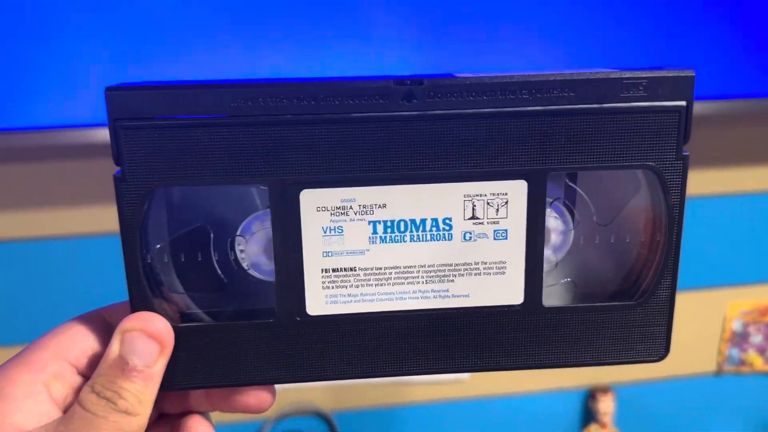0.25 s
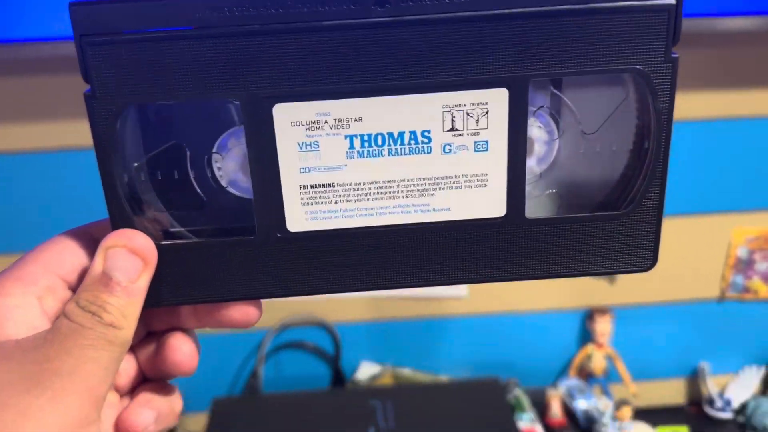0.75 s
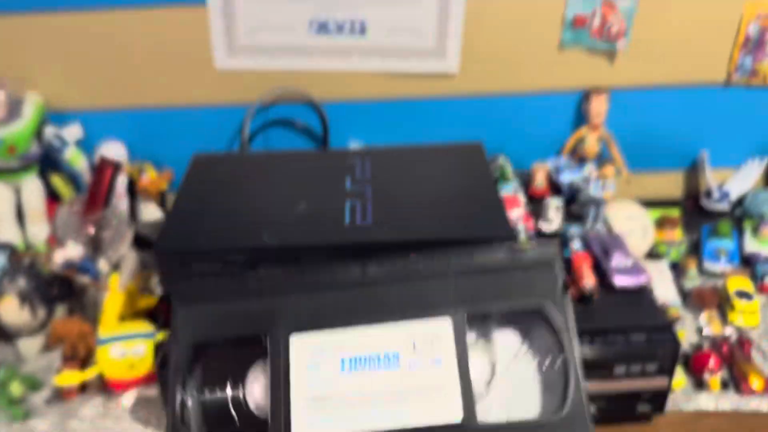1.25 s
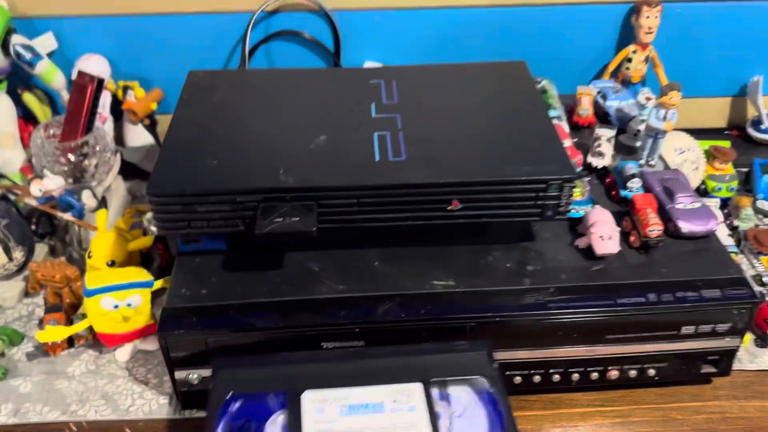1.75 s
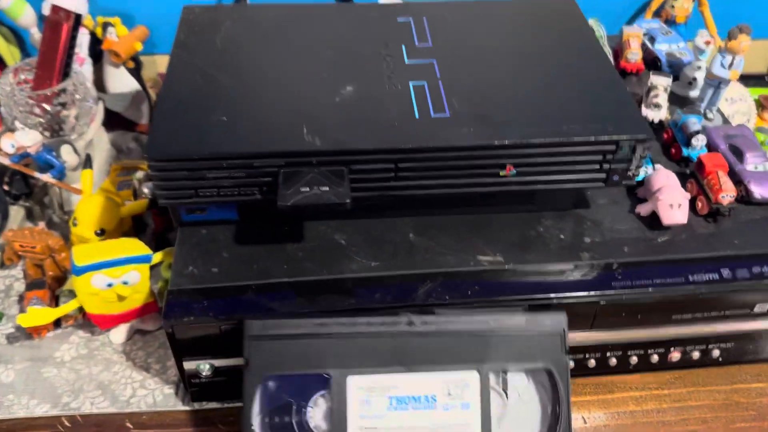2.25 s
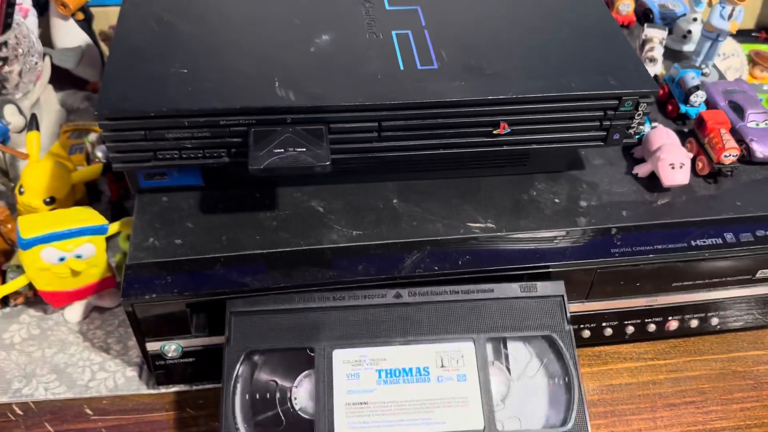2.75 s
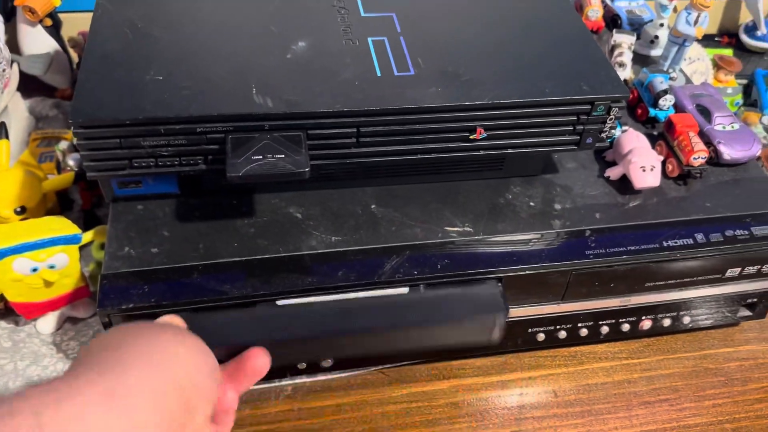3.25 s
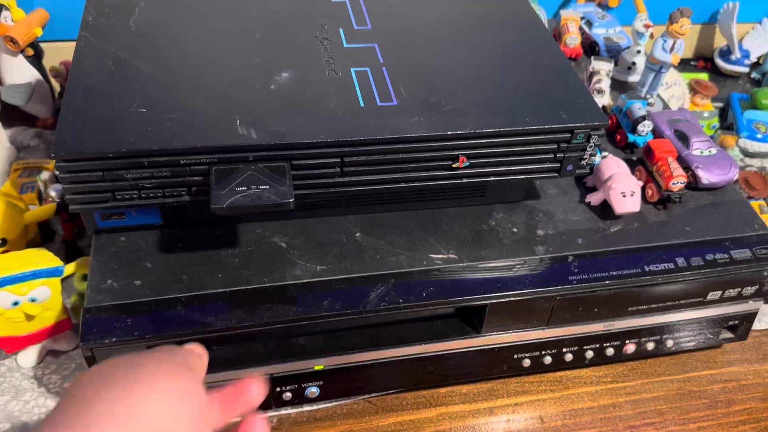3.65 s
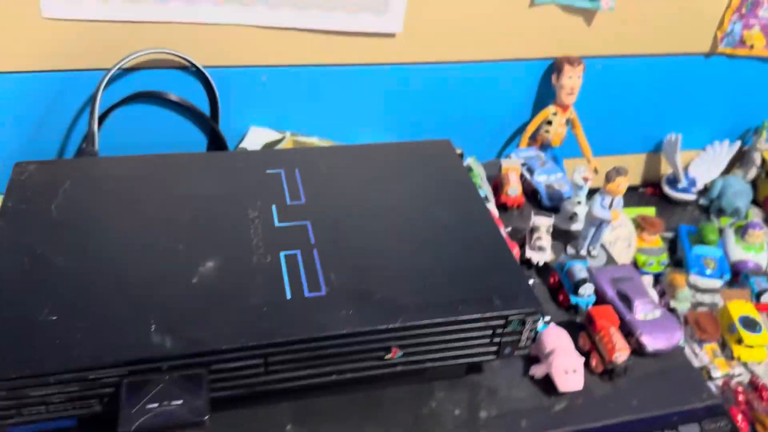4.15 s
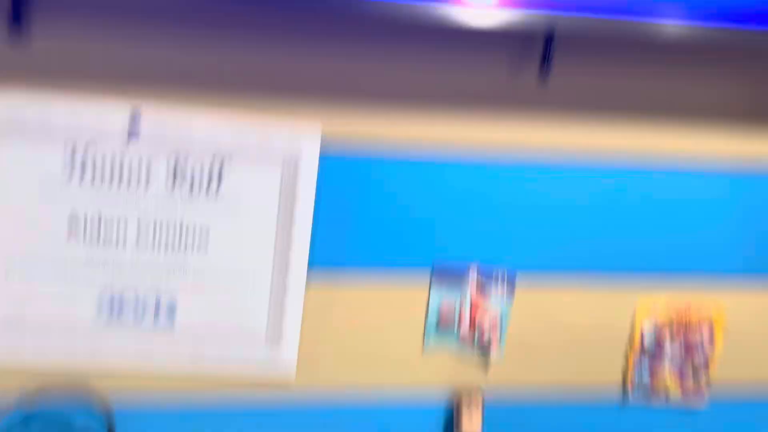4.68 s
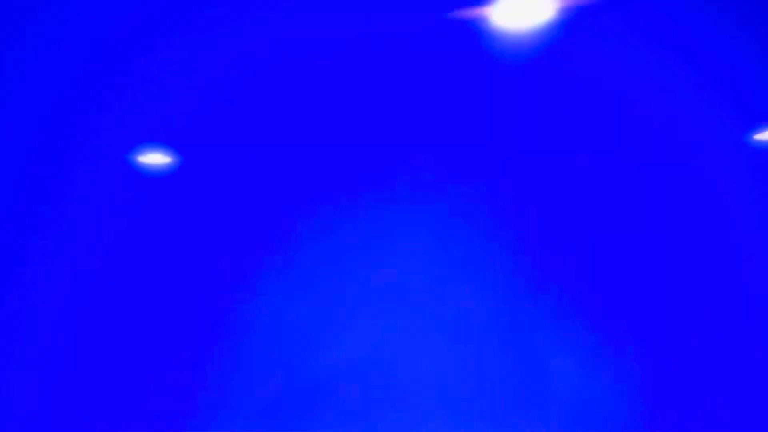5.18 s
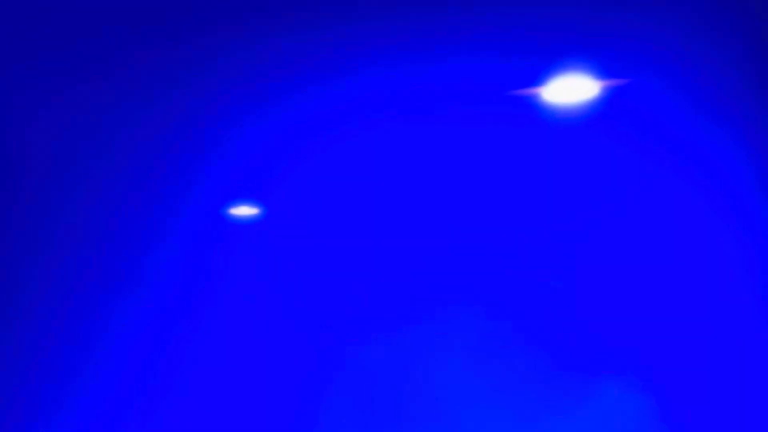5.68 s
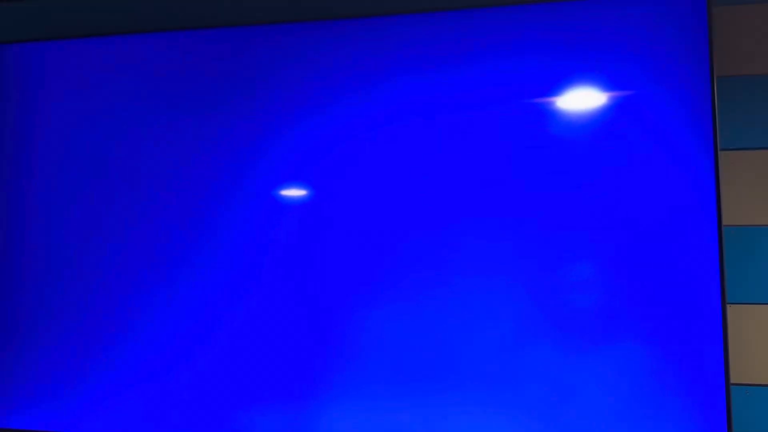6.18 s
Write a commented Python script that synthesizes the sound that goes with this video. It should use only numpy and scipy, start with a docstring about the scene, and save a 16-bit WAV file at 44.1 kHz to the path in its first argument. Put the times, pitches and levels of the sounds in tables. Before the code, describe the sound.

A plastic video cassette knocks and rattles into a player's slot, squeaks as it slides in, then duller mechanism clunks seat it in a humming room.

```python
"""A quiet room with a fan and mains hum; as the phone turns, the room's colour drifts. Near the phone a video
cassette is brought to a player: it knocks the front flap, rattles into the slot and slides in with a squeak.
Then the carriage inside seats it with a few duller clunks, and dry ticks sound close to the phone.
Blows and rubbing are noise in resonances, squeaks and flap are decaying sines, ticks are falling chirps,
and the room is shaped noise plus wavering sines."""
import sys
import numpy as np
from scipy import signal
from scipy.fft import rfft, irfft, next_fast_len
from scipy.io import wavfile
from scipy.ndimage import uniform_filter1d, map_coordinates

SR = 44100
rng = np.random.default_rng(int(sys.argv[2]) if len(sys.argv) > 2 else 0)


def bounce(signal):
    """Save signal as a 16-bit WAV file at the path given by the first command-line argument."""
    frames = np.transpose(np.atleast_2d(signal))
    limited = np.clip(frames, -1, 1)
    pcm = np.round(limited * 32767).astype(np.int16)
    wavfile.write(sys.argv[1], SR, pcm)


N = 283193
TIME = np.arange(N) / SR
SIDE = np.array([[0.5], [-0.5]])  # left, right

# Modes of the player's case. Each row: centre in Hz, width in Hz, relative level in dB.
CASE_MODES = [(135, 39, -4.5), (160, 35, 2), (195, 43, 2.5), (260, 56, 3), (357, 108, 0.5), (417, 56, 0.5)]
# Modes of the hollow cassette. Each row: centre in Hz, width in Hz, relative level in dB.
SHELL_MODES = [(563, 178, -2.5), (848, 190, -3), (955, 104, 0), (1138, 360, -6), (1297, 370, -6.5)]
# Broad top-end modes. Each row: centre in Hz, width in Hz, relative level in dB.
TOP_MODES = [(10100, 3900, 10), (14500, 3000, 7)]


def amp(db):
    """Decibels to gain."""
    return 10 ** (np.asarray(db) / 20)


def unit(x):
    """Scaled to rms 1."""
    return x / np.sqrt(np.mean(np.abs(x) ** 2) + 1e-20)


def along(points, hz):
    """(Hz, value) points interpolated on a log frequency axis."""
    f, v = np.transpose(points)
    return np.interp(np.log(hz + 1), np.log(f + 1), v)


def wobble(rate):
    """A smooth random curve, rate knots a second."""
    knots = rng.standard_normal(int(N * rate / SR) + 4)
    return map_coordinates(knots, [TIME * rate])


def filtered(x, response):
    """x through a complex response of frequency."""
    m = next_fast_len(x.shape[-1] + SR // 8)
    spectrum = rfft(x, m) * response(np.fft.rfftfreq(m, 1 / SR))
    return irfft(spectrum, m)[..., :x.shape[-1]]


def rung(x, modes):
    """x through causal resonances that keep the power of white noise."""
    def response(f):
        return unit(sum((-1) ** k * amp(db) * 1j * f * w / (c * c - f * f + 1j * f * w)
                        for k, (c, w, db) in enumerate(modes)))
    return filtered(x, response)


def favour(modes, hz, fall_db):
    """The struck spot drives the modes near one pitch hardest; others fall by fall_db per octave."""
    return [(c, w, db - fall_db * abs(np.log2(c / hz))) for c, w, db in modes]


def add(out, s, sound, pan_db, lag_s=0):
    """Places a sound at s seconds, panned, the right port lagging."""
    left, right = round(s * SR), round(s * SR) + round(lag_s * SR)
    out[0, left:][:len(sound)] += sound * amp(pan_db / 2)
    out[1, right:][:len(sound)] += sound * amp(-pan_db / 2)


def rush(spectrum, patchy_db):
    """Air noise: stereo, rms 1, with patches of random gain over time and frequency."""
    # Each row: frequency in Hz, left-right likeness from -1 to 1.
    likeness = [(60, 1), (150, 0.81), (380, 0.42), (950, -0.25), (2380, 0.086), (5980, 0.22),
                (15000, -0.56)]
    z = signal.stft(rng.standard_normal((2, N)), nperseg=512)[2]
    field = rng.standard_normal(z.shape[1:])
    field = uniform_filter1d(uniform_filter1d(field, 6, 0), 14, 1)
    pair = signal.istft(z * amp(patchy_db * unit(field)), nperseg=512)[1][:, :N]

    def response(hz):
        turn = np.arccos(np.clip(along(likeness, hz), -1, 1)) / 2
        return amp(along(spectrum, hz)) * [np.cos(turn), np.sin(turn)]

    mid, side = filtered(pair, response)
    return unit(np.array([mid + side, mid - side]))


def room_tone():
    """Rumble, fan and hiss are shaped noise that drifts as the phone turns; the hum is wavering sines."""
    # Each row: time in seconds, rumble in dB, fan in dB, hiss in dB, hum offset in dB.
    drift = [(0, -47.5, -43.5, -53, 0.7), (1.7, -46, -44, -55, -2.2), (2.8, -45, -39.5, -53, 1),
             (3.55, -43, -43, -55.5, 1.3), (5.65, -46, -45.5, -51, 1.2), (6.42, -49, -44, -52, -3.5)]
    # Noise spectra. Each row: frequency in Hz, relative density in dB.
    rumble_spectrum = [(20, -39), (30, -15.5), (48, -2), (62, -4), (80, 8.5), (100, -1.5), (125, 3),
                       (165, 0), (195, -5.5), (230, -55)]
    fan_spectrum = [(150, -40), (200, -10.5), (230, -5), (320, -3.5), (450, -8), (800, -8.5), (1200, -11.5),
                    (1700, -19), (2200, -48.5)]
    hiss_spectrum = [(820, -34), (1400, -2), (2090, -2), (2550, -3.5), (3850, -12), (6860, -13.5),
                     (9160, -23), (9950, -44), (11000, -76), (12900, -50), (14600, -41), (16500, -64)]
    # Each row: partial in Hz, rms level in dB before drift and waver, waver in knots a second.
    hum_partials = [(59.3, -47.5, 8), (119, -48.5, 6), (163, -57, 4), (226.5, -53.5, 4), (288, -57.5, 3),
                    (341, -57, 4), (454, -60.5, 3)]
    s, *levels = np.transpose(drift)
    rumble_db, fan_db, hiss_db, hum_db = (np.interp(TIME, s, db) for db in levels)
    rumble = amp(rumble_db) * rush(rumble_spectrum, patchy_db=0.1)
    fan = amp(fan_db) * rush(fan_spectrum, patchy_db=1.5)
    hiss = amp(hiss_db) * rush(hiss_spectrum, patchy_db=1.34)
    hum = np.zeros(N)
    for hz, db, rate in hum_partials:
        level = amp(db + 3 + hum_db + 2.2 * wobble(rate))  # +3 dB: rms to peak
        hum += level * np.sin(2 * np.pi * hz * TIME + 0.7 * wobble(rate))
    return rumble + fan + hiss + hum


def walls(x):
    """Echo from the walls: a noise tail in which each frequency dies at its own speed."""
    # Each row: frequency in Hz, t60 in seconds.
    decay = [(200, 0.12), (2000, 0.096), (12000, 0.014)]
    hz, t, z = signal.stft(rng.standard_normal((2, SR // 2)), SR, nperseg=256)
    tail = signal.istft(z * amp(-60 * t / along(decay, hz)[:, None]), SR, nperseg=256)[1]
    late = np.pad(x, ((0, 0), (200, 0)))  # 200 samples of delay
    left, right = signal.fftconvolve(late, tail / np.linalg.norm(tail[0]), axes=1)[:, :N]
    # the ports sit close together, so long waves reach both alike
    apart = filtered(left - right, lambda hz: 1j * hz / (600 + 1j * hz))
    return (left + right) / 2 + SIDE * apart


def ticks():
    """Each tick is a snap falling fast from 15 kHz, ending on a few cycles and a faint rustle."""
    # Each row: start in seconds, level in dB, end pitch in Hz, length in seconds,
    # rustle in dB relative to the snap, left minus right in dB.
    tick_rows = [(4.584, -50, 8600, 0.00072, -30, 3), (4.6065, -43, 3200, 0.0018, -23, 1),
                 (4.639, -40, 1800, 0.002, -13, 9), (4.6475, -31, 3100, .0016, -28, 10),
                 (4.9221, -27, 3300, .0013, -36, 1), (5.045, -42, 7100, 0.0016, -3, 10)]
    start_db = -16  # the high start is weaker than the end
    out, t = np.zeros((2, N)), np.arange(SR // 20) / SR
    for s, db, end_hz, length_s, rustle_db, pan_db in tick_rows:
        fall = np.exp(-7 * t / length_s)
        pitch_hz = end_hz + (15000 - end_hz) * fall
        tone = np.sin(2 * np.pi * (np.cumsum(pitch_hz) / SR + rng.random()))
        snap = amp(start_db * fall) * np.exp(-(t / length_s) ** 3) * tone
        rustle = amp(rustle_db - 60 * t / 0.12) * rng.standard_normal(len(t))
        add(out, s, amp(db) * (snap + rustle), pan_db)
    return out


def slide(strokes, treble, grit_db, top_db):
    """Rubbing is gritty noise in resonances of treble, body and top; each stroke bites, holds and fades."""
    attack_s = 0.014
    grit = unit(amp(grit_db * wobble(250) * [[1], [0.4], [1]])) * rng.standard_normal((3, N))
    bodies = (treble, CASE_MODES + SHELL_MODES, TOP_MODES)
    rub, rumble, top = [rung(g, modes) for g, modes in zip(grit, bodies)]
    out = np.zeros(N)
    for s, hold_s, db, rumble_db, fade_db_per_s in strokes:
        bite = np.clip(1 + (TIME - s) / attack_s, 0, 1) ** 2  # full at s
        level = amp(db - fade_db_per_s * np.maximum(TIME - s - hold_s, 0))
        out += bite * level * (rub + amp(rumble_db) * rumble + amp(top_db) * top)
    return out


def blows(table, treble, rise_s, snap, heavy, top_db, pan_db):
    """A hard contact and a short scuffle ring the treble modes, shell and case; harder is brighter."""
    crack_db = -4  # treble crack against a blow's strength
    brightens, usual_blow_db = 0.69, -28  # top-end dB per dB of strength over a usual blow
    scatter_db = 3.5  # each blow lands elsewhere on the case
    spot_lag_s = 0.000025  # spread of the lag between ports, as the struck spot moves
    # per part: crack, top, shell, thump
    decay_share = np.array([[1], [0.8], [heavy], [heavy]])
    contact = snap * np.array([[1.5], [0.9], [6], [6]])
    out, t = np.zeros((2, N)), np.arange(SR // 5) / SR
    for s, db, shell_db, thump_db, treble_hz, shell_hz, t60_s in table:
        # the heavy parts need only a short push: their own ringing carries the tail
        pushes = (1 - np.exp(-t / rise_s)) * amp(-60 * t / (t60_s * decay_share))
        force = pushes * rng.standard_normal(pushes.shape)
        force += contact * signal.unit_impulse(len(t), 20)
        case, bright = ([(c, w, level + scatter_db * rng.standard_normal()) for c, w, level in modes]
                        for modes in (CASE_MODES, treble))
        parts = (favour(bright, treble_hz, 7.1), TOP_MODES, favour(SHELL_MODES, shell_hz, 18.0), case)
        brightness_db = top_db + brightens * (db - usual_blow_db)
        levels_db = db + np.array([crack_db, brightness_db, shell_db, thump_db])
        # each part radiates the energy of its push
        rings = [unit(rung(f, modes)) * np.std(push) for f, modes, push in zip(force, parts, pushes)]
        crack, top, shell, thump = amp(levels_db)[:, None] * rings
        add(out, s, top + thump, pan_db)
        add(out, s, crack + shell, pan_db, spot_lag_s * rng.standard_normal())
    return out


def carriage():
    """The carriage inside the player: duller clunks and its travel, in its own treble modes."""
    # Each row: start in seconds, strength in dB, shell and thump in dB relative to strength,
    # favoured treble in Hz, favoured shell in Hz, t60 in seconds.
    clunks = [(4.115, -39, -12, -18, 6500, 517, 0.1), (4.141, -41.5, 6, 14, 2310, 730, 0.074),
              (4.2278, -27.5, -18, 1, 2570, 692, 0.1), (4.2572, -32, -6, 4, 2480, 845, 0.24),
              (4.2945, -22, 1.5, 1, 2570, 596, 0.026), (4.3186, -24, 5, -20, 2510, 724, 0.031),
              (4.329, -27, -12, -12, 5080, 840, 0.028), (4.4248, -32, -1, 5, 2250, 814, 0.022),
              (4.432, -37, 3.5, -6, 2250, 910, 0.048), (4.4423, -27, 2, -4, 4700, 885, 0.033),
              (4.648, -48, 16, 18, 2250, 950, 0.03), (5.165, -58, 21, 25, 2400, 520, 0.13)]
    # Each row: full-level time in seconds, hold in seconds, rub in dB, rumble in dB relative to rub,
    # fade in dB per second.
    travel = [(4.13, 0.066, -54.5, 3.3, 298), (4.222, 0.11, -46.5, 7.1, 480),
              (4.435, 0.0087, -45, 3.5, 600)]
    # Each row: centre in Hz, width in Hz, relative level in dB.
    treble = [(2160, 250, 15.5), (2540, 160, 17), (2800, 180, 14.5), (3800, 3900, 2.5), (4750, 200, 4),
              (5000, 170, -1), (7000, 1900, 10), (8700, 5700, 2)]
    struck = blows(clunks, treble, rise_s=0.0031, snap=1.8, heavy=0.93, top_db=-15, pan_db=0.5)
    return struck + slide(travel, treble, grit_db=4, top_db=-6.5)


def rasp():
    """Rasping between the squeaks: gritty rubbing in a few narrow high modes."""
    # Each row: full-level time in seconds, hold in seconds, rub in dB, rumble in dB relative to rub,
    # fade in dB per second.
    strokes = [(3.112, 0.034, -44.5, 13.5, 300), (3.165, 0.018, -45, 1.5, 300),
               (3.205, .022, -46.5, 9.1, 400), (3.272, 0.023, -47, 16, 500), (3.468, 0.029, -54, 8.5, 300)]
    # Each row: centre in Hz, width in Hz, relative level in dB.
    treble = [(4440, 170, -3), (5230, 210, 0), (5370, 360, -2)]
    return slide(strokes, treble, grit_db=5.5, top_db=-9)


def squeak(partner_db, rough_db):
    """Each stick-slip rings a high mode beating with a weaker neighbour; two faint chance slips follow."""
    # Each row: start in seconds, level in dB, pitch in Hz.
    slips = [(3.1048, -22.5, 4840), (3.1214, -39, 5150), (3.1364, -31, 4400), (3.1425, -34, 5000),
             (3.157, -26, 4940), (3.164, -30, 4600), (3.179, -25, 4740), (3.1958, -25, 4760),
             (3.2046, -27, 5380), (3.2124, -32, 4540), (3.2264, -34, 4520), (3.2665, -35, 5200),
             (3.301, -43, 5200), (3.439, -39, 4600), (3.475, -32, 5100), (3.4854, -36, 4940),
             (3.4962, -32, 5160), (3.506, -42, 5130), (3.515, -46, 5180)]
    hold_s, t60_s = 0.0033, 0.028
    sag = 0.023  # share of pitch lost over the first 20 ms
    chatter_db, chatter_s, chatter_spread = -20, 0.015, 0.071  # level, most lateness, pitch share
    out, t = np.zeros((2, N)), np.arange(SR // 10) / SR
    sagging = t * (1 - sag * t / 0.04)
    rough = unit(amp(rough_db * wobble(400)))
    chatter = []
    for s, db, hz in slips:
        for late, pick in rng.random(size=(2, 2)):
            chance_hz = hz * (1 + chatter_spread * (2 * pick - 1))
            chatter.append((s + chatter_s * late, db + chatter_db, chance_hz))
    for s, db, hz in slips + chatter:
        partner_hz = hz * (1.09 if hz < 4800 else 0.91)
        tone = np.sin(2 * np.pi * hz * sagging)
        tone += amp(partner_db) * np.sin(2 * np.pi * (partner_hz * sagging + rng.random()))
        decay = amp(db - 3.5 - 60 * np.maximum(t - hold_s, 0) / t60_s)
        add(out, s, decay * (1 - np.exp(-t / 0.00045)) * tone, 0)
    return out * rough


def flap():
    """Each clean hit rings the front flap's modes as decaying sines, a little differently every time."""
    # Each row: mode in Hz, level in dB, t60 in seconds.
    flap_modes = [(212, -14, 0.057), (534, -16, 0.069), (868, -12, 0.072), (939, 4.5, 0.025),
                  (1200, -17, 0.044), (1400, -24, 0.038), (2180, -21, 0.041), (3200, -23, 0.044),
                  (3570, -24.5, 0.049), (4450, -34, 0.065), (5480, -36, 0.049)]
    # Each row: start in seconds, strength in dB.
    hits = [(2.0127, -4), (2.1122, -24), (2.1335, -29.5)]
    rise_s = 0.0022
    out, t = np.zeros((2, N)), np.arange(SR // 5) / SR
    for s, db in hits:
        ring = np.zeros(len(t))
        for hz, level_db, t60_s in flap_modes:
            decay = amp(level_db + 1.6 * rng.standard_normal() - 60 * t / t60_s)
            ring += decay * np.sin(2 * np.pi * hz * t)
        add(out, s, amp(db) * (1 - np.exp(-(t / rise_s) ** 2)) * ring, 0)
    return out


def cassette():
    """The cassette knocks flap and slot and rubs its way in, both ringing its plastic."""
    # Each row: start in seconds, strength in dB, shell and thump in dB relative to strength,
    # favoured treble in Hz, favoured shell in Hz, t60 in seconds.
    knocks = [(2.0127, -20, -12, -10.5, 3300, 944, 0.087), (2.0544, -35.5, 8.5, 5.5, 2290, 571, 0.14),
              (2.1116, -38, 9, -19, 2700, 890, 0.049), (2.1335, -40, 6, 5, 2290, 955, 0.05),
              (2.2635, -48, 0, -10, 2270, 592, 0.055), (2.3545, -31.5, 5.5, 8, 4570, 960, 0.043),
              (2.426, -13, 1, -3, 2270, 880, 0.023), (2.434, -14.5, 4.5, -8, 3180, 910, 0.024),
              (2.4425, -33.5, 2, 1, 2250, 600, 0.028), (2.4582, -14.5, 1.5, 2, 3220, 870, 0.065),
              (2.465, -14, -3, 0, 4400, 600, 0.028), (2.472, -24, -1, 2, 2100, 570, 0.049),
              (2.4958, -12.5, 3, -3, 6400, 866, 0.025), (2.503, -15, 2, -3, 5200, 935, 0.034),
              (2.4975, -22, -3, 1, 2200, 600, 0.02), (2.5328, -23.5, 8.5, 1, 2150, 920, 0.046),
              (2.5578, -13.5, 10, -11, 3180, 627, 0.033), (2.565, -17, -17, -11, 2150, 572, 0.045),
              (2.574, -17.5, 2, 7, 5400, 910, 0.028), (2.6142, -45.5, 14, 14, 2120, 506, 0.3),
              (2.6662, -25, 3, -11, 2720, 840, 0.033), (2.6998, -32, 2, 5, 2370, 888, 0.046),
              (2.7931, -26, 5, 8.5, 2070, 830, 0.057), (2.8672, -26, 8, -11, 2120, 824, 0.051),
              (2.879, -29, 12, 2, 2120, 572, 0.065), (2.885, -31, 12, -11, 3180, 600, 0.043),
              (2.8891, -12, -9, -13, 2150, 567, 0.033), (2.894, -17, 1, -2.5, 4430, 572, 0.0093),
              (2.9062, -10, 6.5, 3.5, 4340, 875, 0.025), (2.919, -27.5, 6, 8, 2150, 572, 0.093),
              (3.0106, -39, 7, 6, 2150, 840, 0.061), (3.052, -35, 9, 1, 2110, 700, 0.047),
              (3.078, -40, 12, 17.5, 5350, 606, 0.079), (3.0955, -27, 0, 0, 5500, 700, 0.037),
              (3.1036, -29, 3, 0, 4790, 790, 0.092), (3.115, -34, -3, 14.5, 4790, 572, 0.18),
              (3.134, -34, 4, 16.5, 4430, 600, 0.11), (3.1567, -34, -13, -8, 5010, 837, 0.096),
              (3.2021, -14.5, -3, -20, 5410, 600, 0.039), (3.208, -20, 7.5, -29, 2150, 597, 0.043),
              (3.2294, -30, 15.5, 17, 2110, 820, 0.035), (3.2485, -33, 1, 0, 2100, 700, 0.031),
              (3.2655, -11.5, -22, -23, 5270, 680, 0.02), (3.275, -30, -5, -1, 5430, 680, 0.034),
              (3.3016, -31, 11, -7, 5020, 680, 0.038), (3.421, -43, 9, 4, 2100, 1140, 0.04),
              (3.4358, -28.5, 1, -13, 6500, 1000, 0.039), (3.4894, -38, -16, -5, 5110, 1010, 0.03),
              (3.4985, -46, -10, 15, 5110, 1010, 0.18), (3.552, -41, 0, 3, 3100, 900, 0.07)]
    # Each row: full-level time in seconds, hold in seconds, rub in dB, rumble in dB relative to rub,
    # fade in dB per second.
    strokes = [(2.255, 0.017, -56, 19, 89), (2.43, 0.045, -43.5, 13.5, 249), (2.5, 0.018, -41.5, 10, 245),
               (2.56, 0.0015, -33.5, 11.5, 507), (2.66, 0.017, -51.5, 19.5, 378),
               (2.885, 0.019, -36.5, 14.5, 307), (2.97, 0.12, -57, 11.5, 400),
               (3.1, 0.064, -37.5, 5.5, 134), (3.23, 0.02, -43, 9.5, 306), (3.268, 0.0061, -36, 3, 486),
               (3.43, 0.055, -44.5, 8, 202)]
    # Each row: centre in Hz, width in Hz, relative level in dB.
    treble = [(2090, 570, 4), (3260, 460, 1.5), (3690, 370, -2), (4390, 520, 1), (5400, 1000, -2),
              (6400, 850, -0.5), (7460, 2700, -3)]
    struck = blows(knocks, treble, rise_s=0.0011, snap=1.46, heavy=0.5, top_db=-13.0, pan_db=-0.9)
    return struck + slide(strokes, treble, grit_db=2.8, top_db=-2.5)


def at_ports(near):
    """Near sounds reach the two microphone ports with different phase and level."""
    # Each row: frequency in Hz, left minus right in dB.
    tilt = [(130, 0), (400, 0), (800, 4.5), (1400, 2.5), (3100, -0.5), (6800, 3), (15000, -0.5)]
    # Each row: frequency in Hz, lead of the left port in radians.
    lead = [(0, -1), (950, 0.42), (1900, 0.5), (2400, 1.5), (3400, 1.68), (4200, 1), (6300, 0.04),
            (7600, 4.5), (9900, 4), (12500, 5.2), (16000, 5.2)]
    return filtered(near, lambda hz: amp(SIDE * along(tilt, hz)) * np.exp(1j * (SIDE + 0.5) * along(lead, hz)))


def scene():
    """Near sounds reach the ports directly and by the walls; ticks and room tone join."""
    near = cassette() + flap() + carriage() + rasp() + squeak(partner_db=-12, rough_db=2.5)
    handling = at_ports(near) + amp(-11.0) * walls(near)
    return handling + ticks() + amp(-1.2 * SIDE) * room_tone()


def record(dry):
    """The sound is hollow around 11 kHz and dark above the band limit."""
    # Each row: frequency in Hz, gain in dB.
    hollow = [(9000, -0.5), (10000, -10), (11000, -29), (12000, -14.5), (12800, -5.5), (15600, -5.5),
              (16200, -29)]
    top_hz = 16900
    return filtered(dry, lambda hz: amp(along(hollow, hz)) * (hz < top_hz))


dry = scene()
out = record(dry)
bounce(out)
```